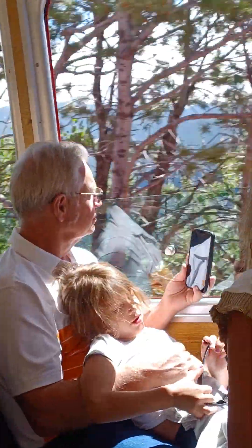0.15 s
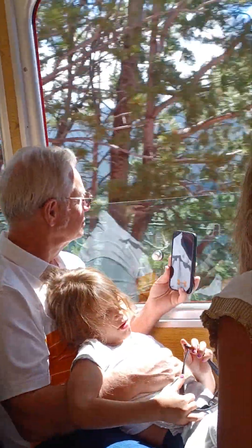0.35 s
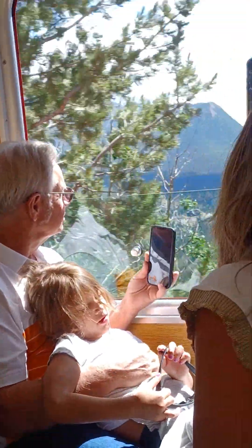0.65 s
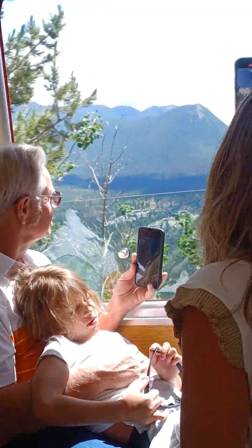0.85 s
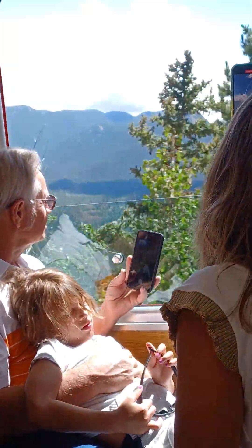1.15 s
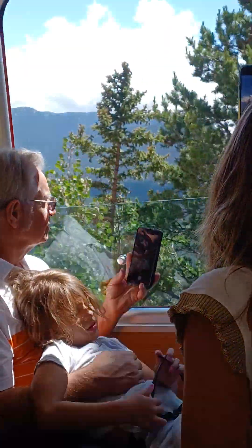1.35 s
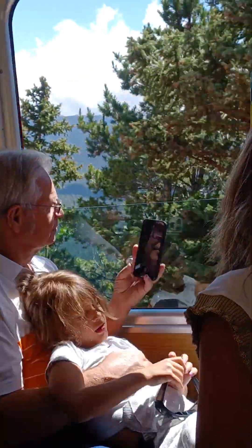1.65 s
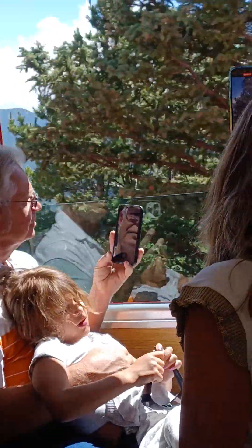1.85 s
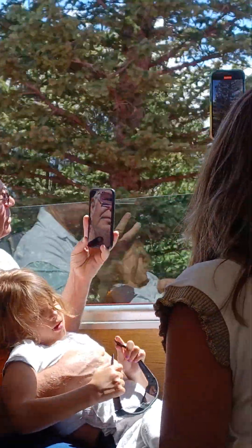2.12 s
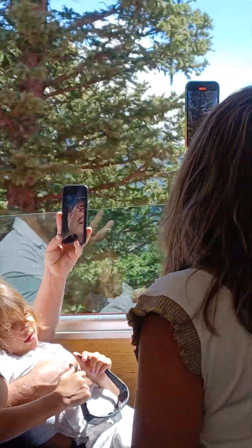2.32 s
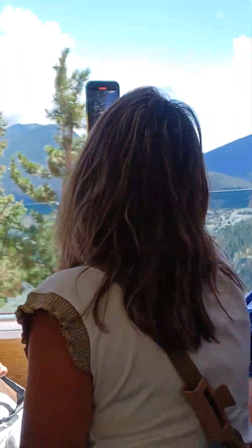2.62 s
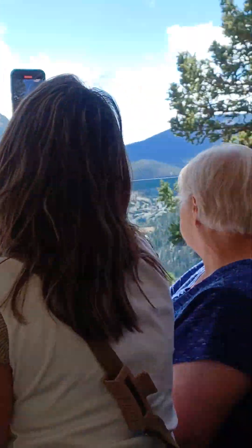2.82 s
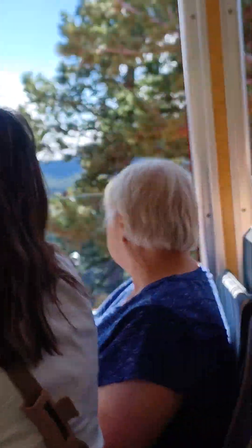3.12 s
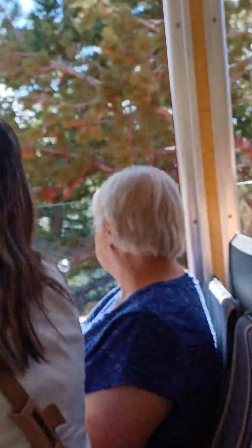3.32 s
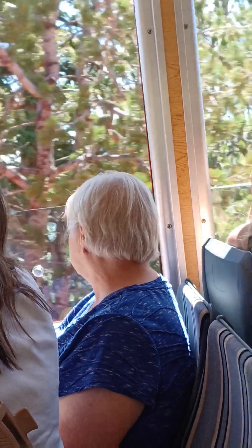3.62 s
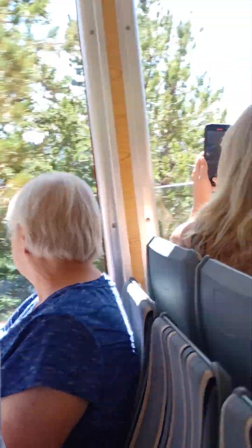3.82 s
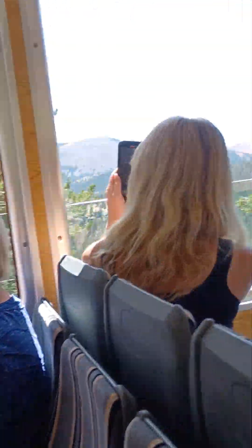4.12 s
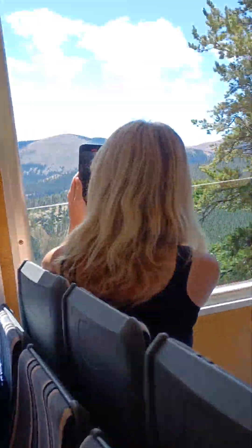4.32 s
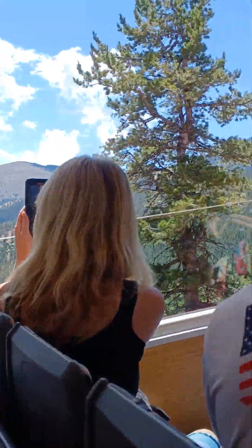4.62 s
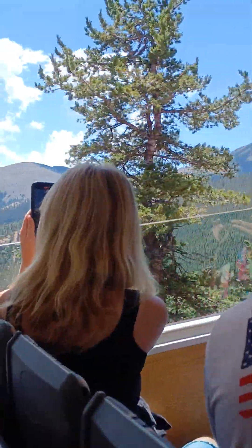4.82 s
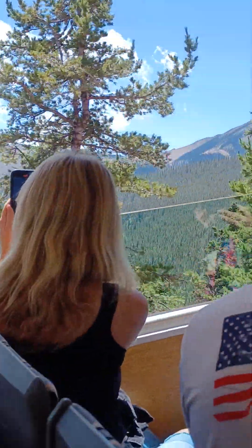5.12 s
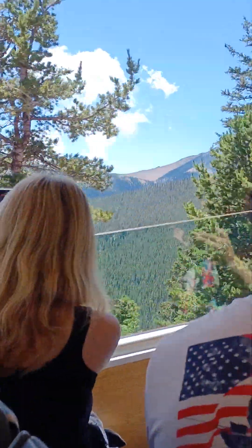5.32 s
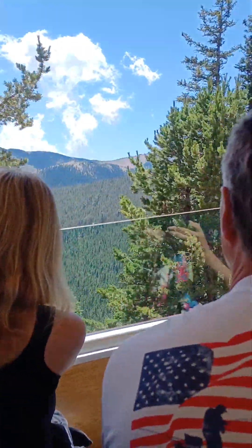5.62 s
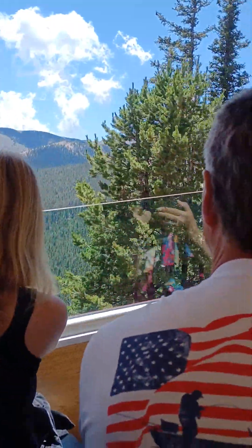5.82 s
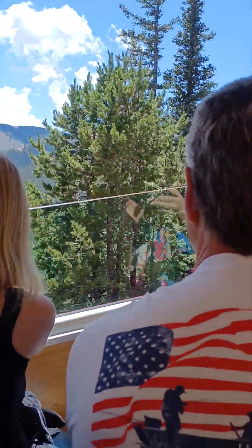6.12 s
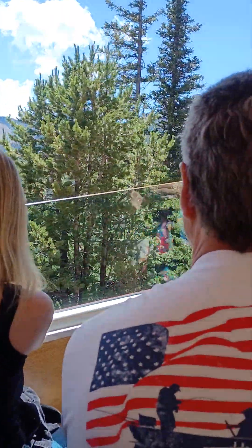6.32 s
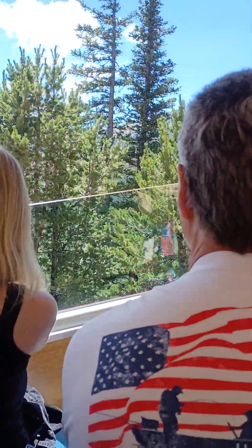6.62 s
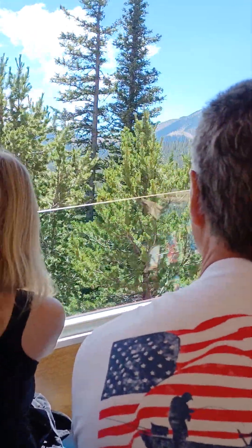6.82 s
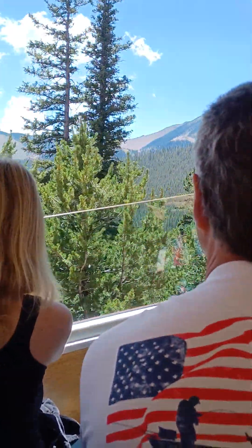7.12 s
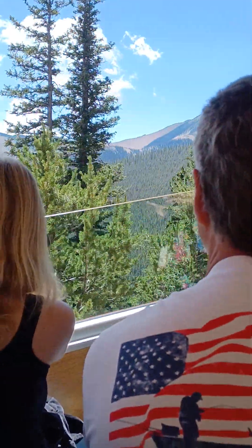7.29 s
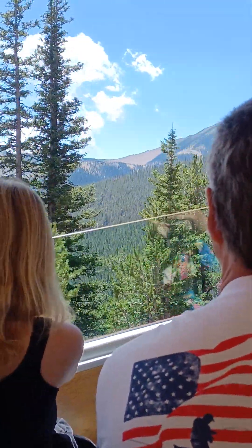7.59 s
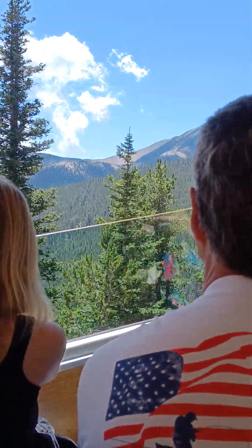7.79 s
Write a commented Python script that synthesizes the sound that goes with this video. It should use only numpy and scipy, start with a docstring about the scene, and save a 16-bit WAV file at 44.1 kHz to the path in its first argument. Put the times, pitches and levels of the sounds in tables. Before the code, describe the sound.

From a seat inside a climbing railcar, a low diesel drone and rolling rumble continue without a break. Gears hum at an even pitch, and a faint high whine wavers over light window hiss. A few tiny dry clicks come nearby early on, with one soft scuff about halfway. The speed stays the same throughout.

```python
"""A diesel engine drones in the cabin of a rack railcar climbing at constant speed.
Its periodic firing gives a harmonic series, some orders of which excite standing waves of the cabin.
A drive shaft hums with its gear mesh, a high whine wavers above, and broadband rolling noise enters
through the floor and open windows. A few small ticks sound close to the slowly turning listener."""
import sys
import numpy as np
from scipy import signal
from scipy.fft import rfft, irfft, next_fast_len
from scipy.io import wavfile
from scipy.ndimage import uniform_filter1d, map_coordinates

SR = 44100
rng = np.random.default_rng(int(sys.argv[2]) if len(sys.argv) > 2 else 0)


def store_wav(level_fs):
    """Save 16-bit WAV to argv[1]."""
    pcm = np.round(np.clip(np.atleast_2d(level_fs), -1, 1) * 32767)
    wavfile.write(sys.argv[1], SR, pcm.T.astype(np.int16))


N = 350595
TIME = np.arange(N) / SR
CYCLE_HZ, SHAFT_HZ, GEAR_TEETH = 17.788, 18.265, 28
BASS_LAG_S = 80e-6  # low sound arrives this much later on the left

# Engine orders that excite standing waves of the cabin: multiple of the firing cycle
RESONANT_ORDERS = (5, 6, 7, 9, 13, 14, 16, 42)
# Their swells: central level/dB, drift/(dB/s), depth, t/s of the trough, left lead/rad, left-right/dB
ORDER_SWELLS = [(-27, -1, 0.17, 4, -0.2, 0.5), (-22, 0.5, 0.52, 2.53, -.12, -1),
                (-28, -0.26, 0.72, 2.75, -0.6, 1), (-26, 1.06, 0.05, 0.25, 0.26, 0),
                (-26, -0.36, 0.05, 5.6, -0.04, 0), (-34.5, 0.63, 0.2, 5.4, 0.5, -0.5),
                (-38, -.5, 0.27, 4.1, -0.85, -5.5), (-44, -1, 0.03, 5.6, -0.5, -1.5)]
# Weaker engine orders: multiple of the firing cycle, level/dB
WEAK_ORDERS = [(3, -40), (4, -45), (8, -60), (10, -39), (11, -49), (12, -46), (15, -52), (17, -42),
               (18, -48), (19, -49.5), (20, -50), (21, -50), (22, -54), (24, -53.5), (25, -47.5), (26, -48),
               (30, -74), (38, -57), (40, -71), (96, -68)]
# Shaft orders: multiple of the rotation rate, level/dB
SHAFT_ORDERS = [(2.5, -42), (4, -51), (5, -38), (6, -42.5), (8, -38), (10, -53), (12, -36), (13.5, -36),
                (20, -53), (24, -60), (46.5, -47.5)]
# Gear mesh tone: t/s, left level/dB, right level/dB, left lead/rad
MESH_TONE = [(0.0, -32.5, -37, 2), (.9, -31, -46.5, -.2), (1.59, -35, -38, -2.7), (1.85, -29, -44, -1.7),
             (2.5, -31, -33.5, -1.5), (2.95, -28, -33, 1), (3.65, -27, -31.5, 0.46),
             (4.3, -33.5, -29.5, 0.5), (4.75, -31.5, -24.5, 0), (5.0, -41, -27.5, 1.4),
             (5.25, -34.5, -30.5, 3), (6.1, -28.5, -37, 3.0), (6.6, -31, -35.5, 4), (6.9, -27.5, -34, 4.0),
             (7.4, -27, -31, 3.5), (7.95, -27.5, -28, 3.5)]
# Its second harmonic: t/s, level/dB
MESH_SECOND = [(0, -48.5), (2.4, -47), (3.1, -45), (4.2, -51), (4.55, -41), (5.75, -62), (6.35, -45.5),
               (7.35, -41.5), (7.95, -48)]
# Strongest hum of the drive: t/s, level/dB before panning
MAIN_HUM = [(0, -37), (.45, -33), (1.6, -33), (2.8, -32), (3.7, -31.5), (5.5, -33.5), (6.35, -37.5),
            (7.4, -32.5), (7.95, -36)]
# Lesser hums: f/Hz
HUM_PITCHES = (194, 269.5, 303, 393, 601, 646, 971, 996.5, 1742, 1880, 2008.5, 2079, 2110.5, 5450)
# The same hums: level/dB, phase waver/rad
HUM_SHAPES = [(-60, 0.4), (-56, .6), (-41.5, 1.04), (-46, 0.31), (-55, 0.72), (-45, 3.3), (-50.5, 2.3),
              (-54, 1.2), (-71, 0.63), (-59, 1.3), (-57, 1.44), (-57.5, 1.4), (-59, 1.5), (-68, 1.5)]
# Pitch of the whine: t/s, f/Hz
WHINE_PITCH = [(0, 4427), (.65, 4439), (1.05, 4434), (1.25, 4423), (1.6, 4436), (2.1, 4439), (3.45, 4439),
               (3.9, 4426), (4.25, 4426), (4.8, 4444), (5.3, 4431), (6.15, 4439), (6.75, 4438),
               (7.05, 4428), (7.4, 4436), (7.95, 4429)]
# Its fundamental: t/s, left level/dB, right level/dB, left lead/rad
WHINE_FIRST = [(0, -47.5, -47, -1.9), (.45, -45.5, -44, -2.5), (.8, -49, -56, -5), (1.21, -43, -54, -6),
               (1.55, -51.5, -52, -9), (1.75, -45, -48, -7.7), (1.88, -45, -56, -8.5),
               (2.02, -39, -60, -11), (2.36, -42, -45, -12.5), (2.57, -52, -54, -14), (2.9, -44, -42, -14),
               (3.03, -56, -53, -15), (3.35, -47, -47.5, -11), (3.72, -42.5, -43.5, -8.5),
               (4.28, -46.5, -47, -6.5), (4.45, -49, -51, -4.5), (4.6, -46.5, -53, -2.5),
               (5.0, -48, -56, -1.5), (5.43, -54, -60, -2), (5.66, -45, -38, 0), (5.87, -53, -56, 1.7),
               (6.05, -50, -54, -.4), (6.16, -43, -51, 0.7), (6.35, -41, -47.5, 1.1), (6.48, -49, -45, 1.1),
               (6.84, -45, -47.5, .6), (7.0, -50, -48, 2.1), (7.4, -46, -51, 1.2), (7.58, -46, -39.5, -1.3),
               (7.95, -52, -41.5, -3)]
# Its third harmonic: t/s, left level/dB, right level/dB
WHINE_THIRD = [(0, -59.5, -50.5), (.65, -63.5, -55), (.95, -57, -52.5), (1.4, -60, -55.5),
               (2.7, -63, -57.5), (3.9, -58, -62), (4.3, -55.5, -60), (5.2, -59, -58), (5.9, -64, -58.5),
               (6.4, -59, -57), (6.9, -54, -53), (7.95, -53.7, -54.4)]
# Rolling noise: t/s, rumble level/dB, rush level/dB
ROLLING_LEVELS = [(0, -25.5, -35.5), (.6, -23, -34.5), (1.3, -23.5, -35), (2.6, -21, -34.5),
                  (3.2, -21, -33.5), (4.7, -22.5, -35.5), (5.5, -22.5, -36), (6.35, -24, -36),
                  (7.4, -20, -35.5), (7.95, -22, -36.5)]
# Window hiss: t/s, level/dB
HISS_LEVEL = [(0, -48.5), (.55, -49.5), (.92, -48.5), (1.4, -49.5), (2.6, -49), (3.0, -48.5), (3.13, -46.5),
              (3.3, -48.5), (4.3, -48), (5.5, -49), (6.3, -49.5), (7.0, -48.5), (7.45, -47.5), (7.58, -45),
              (7.7, -48), (7.95, -48)]
# Noise spectra, low to high: f/Hz, relative spectral level/dB
RUMBLE_SPECTRUM = [(20, -57.5), (32, -28), (50, -5), (62, -15), (72, 2), (90, 0), (150, 2.5), (180, -2.5),
                   (232, 4), (300, 0.5), (350, -4.5), (440, -12), (520, -8), (600, -15.5), (900, -49),
                   (2000, -120)]
RUSH_SPECTRUM = [(300, -120), (400, -28), (550, -3), (600, -9.5), (650, -4.5), (800, -6.5), (920, -8),
                 (990, -7), (1170, -12), (1290, -11), (1500, -15), (2060, -16), (3200, -24), (4200, -34),
                 (5500, -68), (9000, -120)]
HISS_SPECTRUM = [(1500, -120), (2500, -19), (3500, -1.5), (4500, 2), (5500, -2), (6600, -4), (7400, -10),
                 (8000, -13.5), (9000, -10), (10000, -26), (14000, -120)]
SIZZLE_SPECTRUM = [(6000, -120), (8500, -25), (9500, -11), (10300, -8), (11000, -5), (12000, 0),
                   (12800, -4), (13600, -7.5), (14500, -11), (15300, -14), (15700, -13.5)]
# Likeness of the noise at left and right: f/Hz, correlation
COHERENCE = [(40, .97), (150, 0.9), (380, .78), (700, 0.48), (1500, 0.14), (3000, 0.055), (6000, 0.039),
             (8500, 0.098), (10000, 0.23), (12000, 0.45), (15000, 0.31)]
# Lag of the sizzle on the left as the listener turns: t/s, delay/microseconds
SIZZLE_LAG = [(0, 14), (.5, 16), (1.5, 4), (2.5, 15), (3.5, 42), (4.5, 54), (5.5, 59), (6.5, 73), (7.5, 71),
              (7.95, 75)]
# Clicks and scuffs: t/s, starting level/dB, left-right/dB, centre f/Hz, 60 dB decay time/s
TICK_EVENTS = [(.1503, -33, 0, 13200, .012), (.1512, -44, -2, 6500, .015), (.9792, -46, .6, 6500, .06),
               (.9795, -45, .6, 12500, .06), (.9916, -45, 2, 10500, 0.023), (.9918, -45, 0, 5800, .05),
               (.9949, -42, -.6, 12000, .05), (4.469, -41, 0, 3000, 0.13)]


def engine(swell_s=4.41, swell_edge=.99):
    """Periodic excitation: firing gives phase-locked harmonics; the resonant ones drift and swell."""
    cycle = 2 * np.pi * CYCLE_HZ * TIME + .012 * wobble(2.1)
    orders = []
    for k, db in WEAK_ORDERS:
        hz = k * CYCLE_HZ
        orders.append((k, db, -2 * np.pi * hz * BASS_LAG_S + .6 * phase_wander(hz), 0))
    for k, (db, drift, depth, trough_s, lead, pan_db) in zip(RESONANT_ORDERS, ORDER_SWELLS):
        fade = np.tanh(swell_edge * np.cos(2 * np.pi * (TIME - trough_s) / swell_s))
        gain = amp(drift * (TIME - TIME.mean())) * (1 - depth * fade / np.tanh(swell_edge))
        lead = lead / gain + .25 * phase_wander(k * CYCLE_HZ)  # the sides differ most when faint
        orders.append((k, db + 20 * np.log10(gain), lead, pan_db))
    out = np.zeros((2, N))
    for k, db, lead, pan_db in orders:
        spread = -1.45 * k * k - .3 * k - .85  # quadratic phase keeps orders from piling into a thump
        level_db = db + .46 * wobble(4.9) + .0641 * k * wobble(2.5)  # high orders waver more
        phase = k * cycle + spread + .15 * wobble(4)
        out += tone(phase, level_db + pan_db / 2, level_db - pan_db / 2, lead)
    return out


def drive_shaft():
    """Rotation sounds at orders of the shaft rate; the gear meshes at that rate times its tooth count."""
    shaft = 2 * np.pi * SHAFT_HZ * TIME + .01 * wobble(3)
    out = np.zeros((2, N))
    for k, db in SHAFT_ORDERS:
        level_db = db + 1.8 * wobble(2.1)
        phase = k * shaft + rng.uniform(0, 2 * np.pi)
        out += tone(phase, level_db, level_db, phase_wander(k * SHAFT_HZ))
    mesh = GEAR_TEETH * shaft
    left_db, right_db, lead = curves(MESH_TONE)
    out += tone(mesh, left_db + 1.1 * wobble(12), right_db + 1.1 * wobble(12), lead)
    octave_db, pan_db = curves(MESH_SECOND)[0], 6 * wobble(2.52) - 3
    lead = phase_wander(2 * GEAR_TEETH * SHAFT_HZ)
    return out + tone(2 * mesh, octave_db + pan_db / 2, octave_db - pan_db / 2, lead)


def drive_hums(main_hz=322.7):
    """Random phase and amplitude modulation broadens each hum of the drive into a narrow band."""
    db = curves(MAIN_HUM)[0] + 1.4 * wobble(6)
    phase = 2 * np.pi * main_hz * TIME + .65 * wobble(6)
    out = tone(phase, db + 2, db - 1, lead=.45 * wobble(3.05) - .4)
    for hz, (db, waver) in zip(HUM_PITCHES, HUM_SHAPES):
        level_db = db + 1.8 * wobble(2.5)
        out += tone(2 * np.pi * hz * TIME + waver * wobble(8), level_db, level_db, phase_wander(hz))
    return out


def whine(dip_depth=.73):
    """Modulation: a high, fluttering tone has sidebands spaced by three times the engine cycle rate."""
    phase = 2 * np.pi * np.cumsum(curves(WHINE_PITCH)[0]) / SR
    shake = 2 * np.pi * 3 * CYCLE_HZ * TIME
    *level_db, lead = curves(WHINE_FIRST)
    dips = 1 - dip_depth * (.5 + .5 * np.tanh(3 * (wobble(36) - .67)))  # brief drops in level
    carrier = unit(dips * scattered(phase, direct=3, rate=30, alike=.7, lead=lead))
    upper, lower = [
        unit(amp(2.5 * wobble(5)) * scattered(phase + k * shake, direct=.5, rate=36, alike=.5, lead=lead))
        for k in (1, -1)]
    sideband_gain = amp(np.array(level_db) * .5 - 31.5) * dips / dips.mean()
    out = amp(level_db) * carrier + sideband_gain * (upper + amp(-1.5) * lower)
    second_db = [[-67], [-66]] + 1.4 * wobble(5)
    out += amp(second_db) * scattered(2 * phase, direct=.47, rate=70, alike=.41, lead=lead)
    third = np.zeros((2, N))
    for k in range(-2, 3):
        line = scattered(3 * phase + k * shake, direct=.6, rate=60, alike=.79, lead=2.5 * wobble(1.5))
        third += amp(-2.2 * k * k) * line
    return out + amp(curves(WHINE_THIRD)) * unit(third)


def rolling():
    """Broadband excitation: the floor rumbles, the track rushes, hiss and sizzle enter by the windows."""
    rumble_db, rush_db = curves(ROLLING_LEVELS)
    hiss_db = curves(HISS_LEVEL)[0]
    flutter = wobble(22)  # common to hiss and sizzle
    rumble = amp(rumble_db) * noise(RUMBLE_SPECTRUM, patchy_db=1.2)
    rumble[0] = np.roll(rumble[0], round(BASS_LAG_S * SR))
    rush = amp(rush_db) * noise(RUSH_SPECTRUM, patchy_db=.85)
    hiss = amp(hiss_db + .51 * flutter) * noise(HISS_SPECTRUM, patchy_db=.5)
    left, right = noise(SIZZLE_SPECTRUM, patchy_db=1.5)
    delayed_s = TIME - curves(SIZZLE_LAG)[0] * 1e-6
    left = map_coordinates(left, [delayed_s * SR], order=5)
    sizzle = amp(hiss_db + .46 * flutter) * amp([[-1.4], [.2]]) * [left, right]
    return rumble + rush + hiss + sizzle


def ticks():
    """Damped resonance: each small, dry click is a broad band of noise decaying exponentially."""
    out, t = np.zeros((2, N)), np.arange(SR // 10) / SR
    for onset_s, db, pan_db, hz, t60 in TICK_EVENTS:
        band = signal.butter(2, [.75 * hz, 1.2 * hz], "bandpass", fs=SR)
        burst = unit(signal.lfilter(*band, rng.standard_normal(len(t)))) * amp(-60 * t / t60)
        start = round(onset_s * SR)
        out[:, start:start + len(t)] += amp([[db + pan_db / 2], [db - pan_db / 2]]) * burst
    return out


def tone(phase, left_db, right_db, lead):
    """Phase difference: a stereo sine at the given rms levels, the left ahead by lead radians."""
    return np.sqrt(2) * amp([left_db, right_db]).reshape(2, -1) * np.cos([phase + lead/2, phase - lead/2])


def phase_wander(hz):
    """Reflections shift the phase between left and right, more for short wavelengths."""
    return np.clip((hz / 520) ** 2, .3, 2.5) * wobble(1.5)


def scattered(phase, direct, rate, alike, lead):
    """Multipath interference: a direct sine plus shifting reflections flutters; stereo, rms 1."""
    shared, *separate = [wobble(rate) + 1j * wobble(rate) for _ in range(3)]
    reflections = alike * shared + np.sqrt(1 - alike ** 2) * np.array(separate)
    return unit(((direct + reflections) * np.exp(1j * (phase + [lead / 2, -lead / 2]))).real)


def noise(spectrum, patchy_db):
    """Partial coherence: stereo noise of rms 1, most alike in the bass, with patches of random gain."""
    def mid_side_gains(hz):
        angle = np.arccos(along(COHERENCE, hz)) / 2
        return amp(along(spectrum, hz)) * [np.cos(angle), np.sin(angle)]

    bins = signal.stft(rng.standard_normal((2, N)), nperseg=512)[2]
    patches = uniform_filter1d(rng.standard_normal(bins.shape[1:]), size=8, axis=0)
    patches = uniform_filter1d(patches, size=10, axis=1)
    pair = signal.istft(bins * amp(patchy_db * unit(patches)), nperseg=512)[1][:, :N]
    mid, side = filtered(pair, mid_side_gains)
    return unit(np.array([mid + side, mid - side]))


def filtered(x, response):
    """Linear filtering: the spectrum of x times a frequency response."""
    size = next_fast_len(N + 8192)
    return irfft(rfft(x, size) * response(np.fft.rfftfreq(size, 1 / SR)), size)[..., :N]


def wobble(rate):
    """Smooth random modulation with rate knots a second."""
    return map_coordinates(rng.standard_normal(int(N * rate / SR) + 4), [TIME * rate])


def curves(rows):
    """Linear interpolation of each column after t/s, one value per sample."""
    times, *columns = np.transpose(rows)
    return [np.interp(TIME, times, column) for column in columns]


def along(points, hz):
    """Interpolation of (f/Hz, value) points on a logarithmic frequency axis."""
    freqs, values = np.transpose(points)
    return np.interp(np.log(hz + 1), np.log(freqs + 1), values)


def amp(db):
    """Amplitude ratio of a level in dB."""
    return 10 ** (np.asarray(db) / 20)


def unit(x):
    """Normalisation to rms 1."""
    return x / np.sqrt(np.mean(x ** 2) + 1e-20)


def scene():
    """Superposition: the pressures of all sources add at left and right."""
    return engine() + drive_shaft() + drive_hums() + whine() + rolling() + ticks()


def record(dry):
    """Band limiting: an ideal low-pass filter removes the highest treble."""
    return filtered(dry, lambda hz: hz < 15714)


dry = scene()
out = record(dry)
store_wav(out)
```